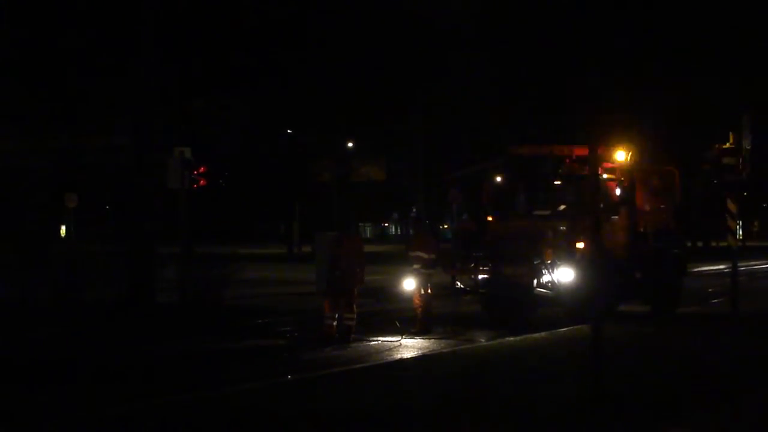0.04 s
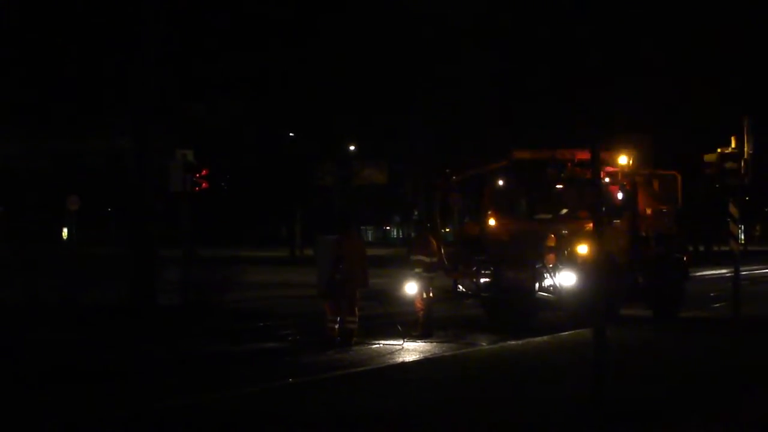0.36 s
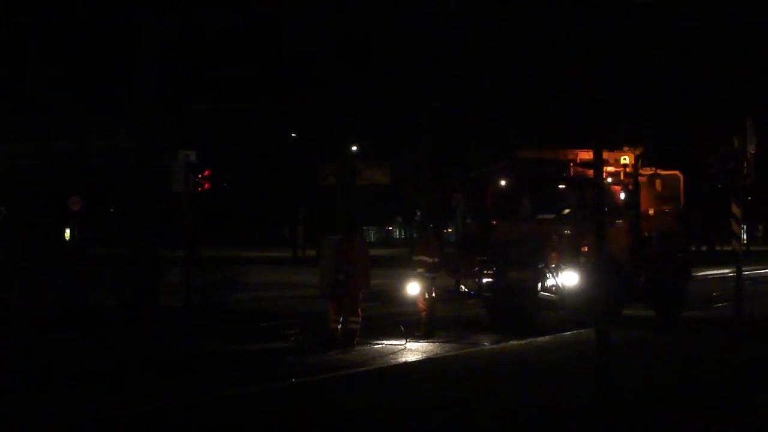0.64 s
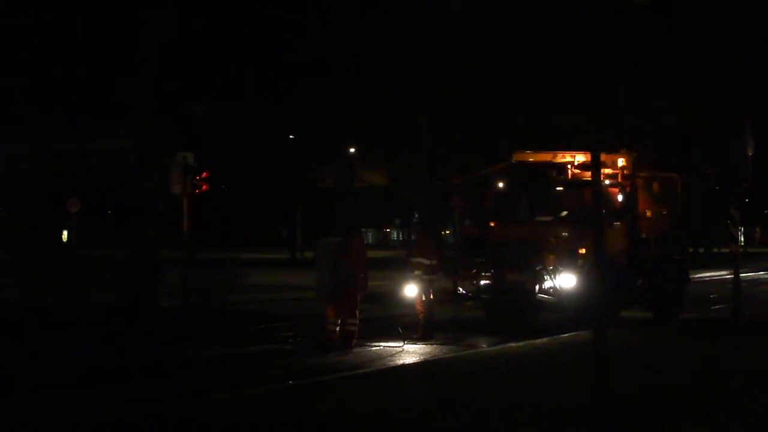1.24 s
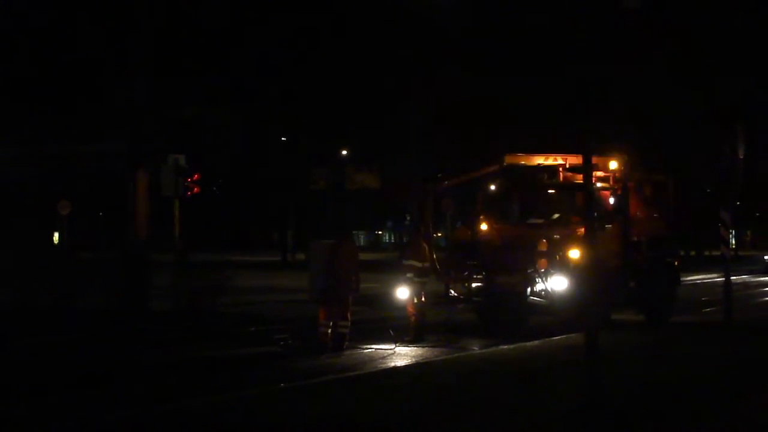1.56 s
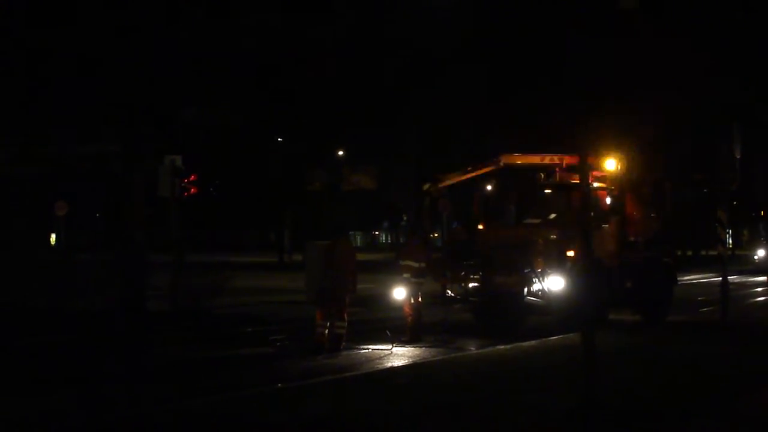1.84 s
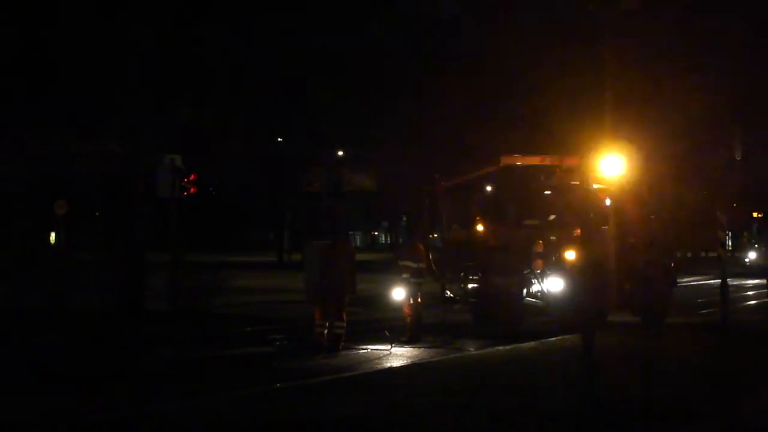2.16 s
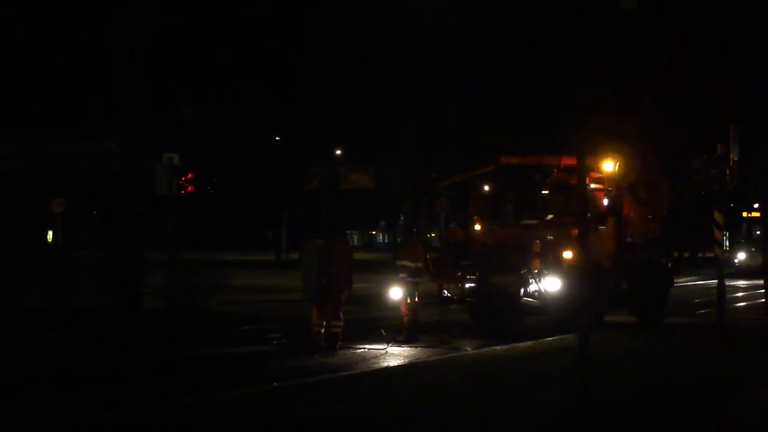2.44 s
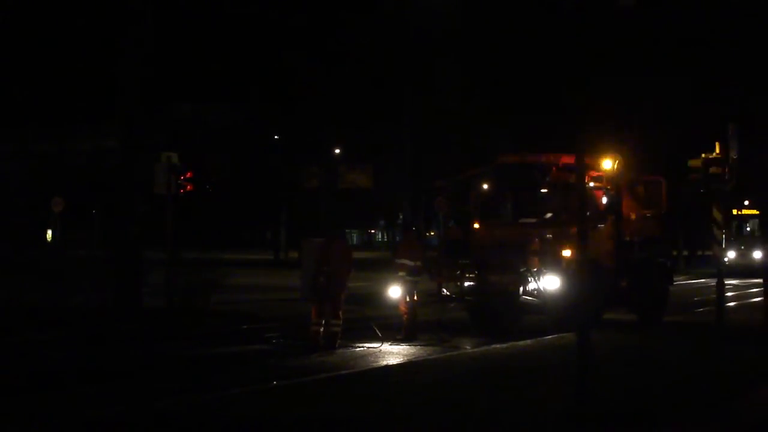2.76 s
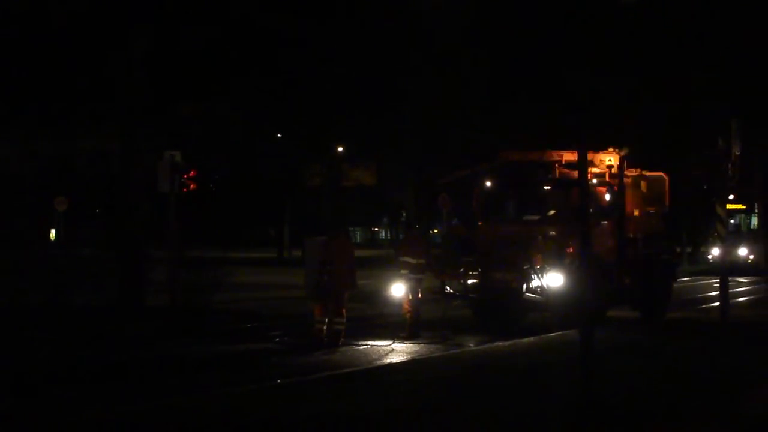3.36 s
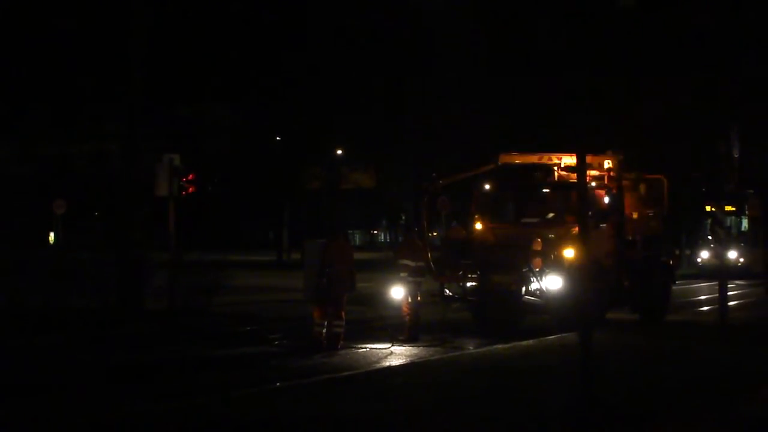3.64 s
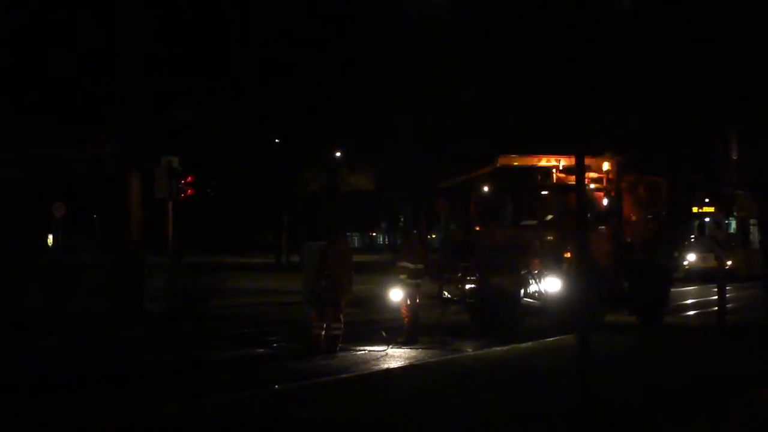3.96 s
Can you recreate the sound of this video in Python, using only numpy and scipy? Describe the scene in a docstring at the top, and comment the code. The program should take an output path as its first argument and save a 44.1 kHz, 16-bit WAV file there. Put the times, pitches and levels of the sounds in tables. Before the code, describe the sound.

A diesel work truck idles steadily some way down a street, straight ahead of the microphone. Its loping clatter of knocks, rattles and ticks runs throughout over a throbbing drone and thin whines, with a short echo.

```python
"""The loping clatter of a six-cylinder diesel work truck, idling some way off on a quiet street at night.
Each firing booms, knocks, rattles and ticks; the cylinders differ, so the pattern comes round about
six times a second. A throbbing drone and thin whines follow the engine speed. The microphone faces
the truck, and the street adds a short echo and a little width."""
import sys
import numpy as np
from scipy import signal
from scipy.fft import rfft, irfft
from scipy.io import wavfile

SR = 44100
rng = np.random.default_rng(int(sys.argv[2]) if len(sys.argv) > 2 else 0)


def store_wav(level_fs):
    """Save 16-bit WAV to argv[1]."""
    pcm = np.round(np.clip(np.atleast_2d(level_fs), -1, 1) * 32767)
    wavfile.write(sys.argv[1], SR, pcm.T.astype(np.int16))


N = 176400

# Relative strength of each cylinder, in firing order:
# (boom [dB], hum [dB], whine [dB], knock [dB], rattle [dB], tick [dB])
CYLINDERS = [(-1, 3, 2.8, 1.5, -0.5, 6.5), (-2, -5, -4, -2.5, 1.5, 3), (.5, -1, -0.5, -0.5, 0, 6),
             (-3.5, -5.5, 0.5, -2.5, -3.5, 3.5), (-1, -5, -4, 1.5, 0.5, 6.5), (0.5, 3.5, 2, -0.5, 0.5, 4)]
# The four parts of a firing, heard from down the street: (frequency [Hz], relative level [dB])
BOOM_SPECTRUM = [(25, -50), (45, -52), (70, -26), (105, -21), (150, -11.5), (215, -1), (290, 2), (350, 1.5),
                 (440, -4), (600, -1.5), (1000, -21), (2000, -67)]
KNOCK_SPECTRUM = [(200, -54), (400, -11), (500, -5), (720, 1.5), (820, 2), (900, -3), (1000, -2), (1200, 2),
                  (1330, -1.5), (1500, -7), (1680, -6.5), (1830, -5), (2050, -13.5), (2350, -8.5),
                  (2700, -20), (3300, -36.5), (5000, -39), (9000, -70)]
RATTLE_SPECTRUM = [(1300, -34), (1620, -26), (1730, 0), (1820, 0), (1880, -0.5), (1990, 0.5), (2100, -5.5),
                   (2220, -1), (2330, -7.5), (2900, -40.5)]
TICK_SPECTRUM = [(800, -11.5), (1800, 15), (2600, 5), (3100, 9), (3310, 12), (3450, 4), (3600, 7),
                 (3800, -6), (4400, 0), (5400, 7), (5700, 1), (5920, 6), (6100, -1), (6330, 4),
                 (6850, -3.5), (7220, 0.5), (7550, 0.5), (8000, -5.5), (8480, -3.5), (8950, -9.5),
                 (9500, -8.5), (10000, -14.5), (10800, -26)]


def engine_clatter():
    """Low boom, combustion knock, metallic rattle and injector ticks, all on the same firings."""
    starts = firing_times()
    boom_db, _, _, knock_db, rattle_db, tick_db = np.array(CYLINDERS).T
    boom = firings(starts, boom_db, attack_s=0.0014, decay_s=0.01,
                   gap_s=0.01275, second_db=0, repeat_share=0.19, scatter_db=0.6)
    knock = firings(starts, knock_db, attack_s=0.0008, decay_s=0.017,
                    gap_s=0.015, second_db=-2, repeat_share=0.2, scatter_db=0.42)
    rattle = firings(starts, rattle_db, attack_s=0.00088, decay_s=0.017,
                     gap_s=0.0069, second_db=1, repeat_share=0.12, scatter_db=0.2)
    tick = firings(starts, tick_db, attack_s=0.00063, decay_s=0.03,
                   gap_s=0.006, second_db=2, repeat_share=0.48, scatter_db=1.4)
    return (level(colour(boom, BOOM_SPECTRUM), db=-35.5)
            + level(colour(knock, KNOCK_SPECTRUM), db=-35)
            + level(colour(rattle, RATTLE_SPECTRUM), db=-45)
            + level(colour(tick, TICK_SPECTRUM), db=-45.5))


def firings(starts, cylinder_db, attack_s, decay_s, gap_s, second_db, repeat_share, scatter_db):
    """Each firing strikes twice, mixing its cylinder's own repeating ring with fresh noise."""
    def blow(age):
        age = np.maximum(age, 0)
        return (1 - np.exp(-age / attack_s)) * np.exp(-age / decay_s)

    size = SR // 8
    t = np.arange(size) / SR
    envelope = np.hypot(blow(t), undb(second_db) * blow(t - gap_s))  # the two blows add in power
    own_ring = rng.standard_normal((len(cylinder_db), size))
    out = np.zeros(N + 2 * SR)  # a spare second at each end
    for k, start in enumerate(starts):
        cylinder = k % len(cylinder_db)
        fresh = rng.standard_normal(size)
        ring = np.sqrt(repeat_share) * own_ring[cylinder] + np.sqrt(1 - repeat_share) * fresh
        gain = undb(cylinder_db[cylinder] + scatter_db * rng.standard_normal())
        onset = SR + int(start * SR)
        out[onset:onset + size] += ring * envelope * gain
    return out[SR:SR + N]


def firing_times(jitter_s=0.00022):
    """Slightly uneven firing instants, starting a cycle early so the truck is already running."""
    t = np.arange(-SR // 2, N + SR // 2) / SR
    numbers = np.arange(-len(CYLINDERS), firing_count(np.arange(N) / SR)[-1])
    return np.interp(numbers, firing_count(t), t) + jitter_s * rng.standard_normal(len(numbers))


# The nearly steady idle: (time [s], firing rate [Hz])
IDLE_SPEED = [(0, 35.61), (.5, 35.56), (1.7, 35.51), (2.5, 35.57), (3.2, 35.52), (4, 35.49)]


def firing_count(t, first_firing_s=0.0166):
    """How many firings have passed at the times t; every engine sound follows this count."""
    count = np.cumsum(np.interp(t, *np.array(IDLE_SPEED).T)) / SR
    return count - np.interp(first_firing_s, t, count)


# Swell and fade of the hum at the microphone: (time [s], relative level [dB])
HUM_SWELL = [(0, -43.5), (.3, -42), (.75, -47.5), (1.1, -44.5), (1.3, -47.5), (1.55, -40), (2, -51),
             (2.3, -42), (2.52, -54.5), (2.9, -44), (3.3, -45.5), (3.55, -44), (4, -46)]
# Whines that turn with the engine: (order [multiple of the cycle rate], level [dB])
WHINES = [(56, -45.5), (59, -51), (62, -52.5), (66, -52.5), (69, -61), (84, -52.5), (90, -47), (93, -46),
          (99, -54.5), (102, -44.5), (121, -53.5), (123, -49.5), (147, -50), (159, -48.5), (168, -56),
          (191, -52), (202, -54)]


def engine_drone(hum_order=44, hum_gain_db=4.5):
    """A hum near 260 Hz and the thinner whines above it throb with each engine cycle."""
    _, hum_db, whine_db, *_ = np.array(CYLINDERS).T
    hum = engine_tone(hum_order, slip_rad=0.2, flutter_db=-0.6) * undb(curve(HUM_SWELL) + hum_gain_db)
    whines = sum(undb(db) * engine_tone(order, slip_rad=0.17, flutter_db=0.9) for order, db in WHINES)
    return hum * lope(hum_db) + whines * lope(whine_db)


def engine_tone(order, slip_rad, flutter_db):
    """A tone locked to a multiple of the cycle rate; it slips a little in phase and flutters."""
    cycles = firing_count(np.arange(N) / SR) / len(CYLINDERS)
    phase = 2 * np.pi * (order * cycles + rng.random()) + slip_rad * drift(rate_hz=8.2)
    flutter = undb(flutter_db * drift(rate_hz=9))
    return level(np.sin(phase) * flutter, 0)


def lope(cylinder_db):
    """Gain that rises and falls smoothly with the cylinder that is firing, rms 1."""
    cylinders = len(cylinder_db)
    count = firing_count(np.arange(N) / SR)
    gain_db = np.interp(count, np.arange(cylinders) + 0.5, cylinder_db, period=cylinders)
    return level(undb(gain_db), 0)


def street_echo(x, t60_s, delay_s):
    """Scattered reflections from the street that die away, about as strong as the sound itself."""
    t = np.arange(N) / SR
    tail = rng.standard_normal(N) * np.exp(-np.log(1000) * t / t60_s) * (t >= delay_s)
    tail /= np.sqrt(np.sum(tail ** 2))
    return irfft(rfft(x) * rfft(tail), N)


def undb(db):
    """Decibels to gain."""
    return 10 ** (np.asarray(db) / 20)


def level(x, db):
    """Scale to an rms level."""
    return x * undb(db) / np.sqrt(np.mean(x ** 2))


def curve(rows):
    """Join (time [s], value) rows by straight lines."""
    return np.interp(np.arange(N) / SR, *np.array(rows, float).T)


def colour(x, points):
    """Filter by (frequency [Hz], gain [dB]) points on a log-frequency axis."""
    hz, db = np.array(points, float).T
    f = np.maximum(np.fft.rfftfreq(N, 1 / SR), 1)
    gain = undb(np.interp(np.log(f), np.log(hz), db))
    return irfft(rfft(x) * gain, N)


def drift(rate_hz):
    """Smooth random wander, rms 1."""
    f = np.fft.rfftfreq(N, 1 / SR)
    lowpass = np.exp(-(f / rate_hz) ** 2)
    return level(irfft(rfft(rng.standard_normal(N)) * lowpass, N), 0)


# Share of the sound that differs between left and right: (frequency [Hz], side level [dB])
STEREO_WIDTH = [(30, -9), (60, -7), (130, -13), (400, -21), (900, -19.5), (1800, -11), (3300, -12),
                (4500, -5.5), (6000, -7), (7000, -4.5), (10000, -1)]


def scene(echo_db=-7.5):
    """The truck some way off, straight ahead of the microphone; near reflections spread it sideways."""
    clatter = engine_clatter()
    echo = undb(echo_db) * street_echo(clatter, t60_s=0.58, delay_s=0.0092)
    mid = clatter + echo + engine_drone()
    side = colour(street_echo(mid, t60_s=0.1, delay_s=0), STEREO_WIDTH)
    return np.array([mid + side, mid - side])


# Narrow dips in the recorder's response: (frequency [Hz], width of the broader notch [Hz])
RECORDER_NOTCHES = [(3040, 695), (4030, 340), (5030, 1000)]


def record(dry, top_hz=10850):
    """Behind the microphone, the recorder notches three narrow bands and cuts the top."""
    for hz, width_hz in RECORDER_NOTCHES:
        for q in (hz / width_hz, 2 * hz / width_hz):
            dry = signal.lfilter(*signal.iirnotch(hz, q, fs=SR), dry)
    steep_lowpass = signal.ellip(10, 0.2, 80, top_hz, fs=SR, output="sos")
    return signal.sosfilt(steep_lowpass, dry)


dry = scene()
out = record(dry)
store_wav(out)
```